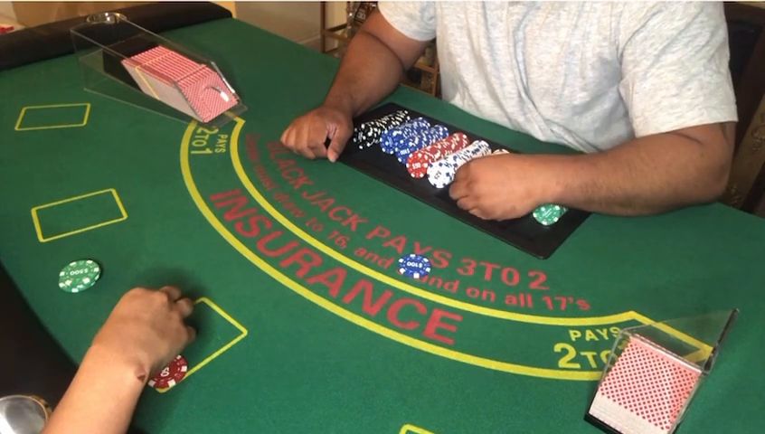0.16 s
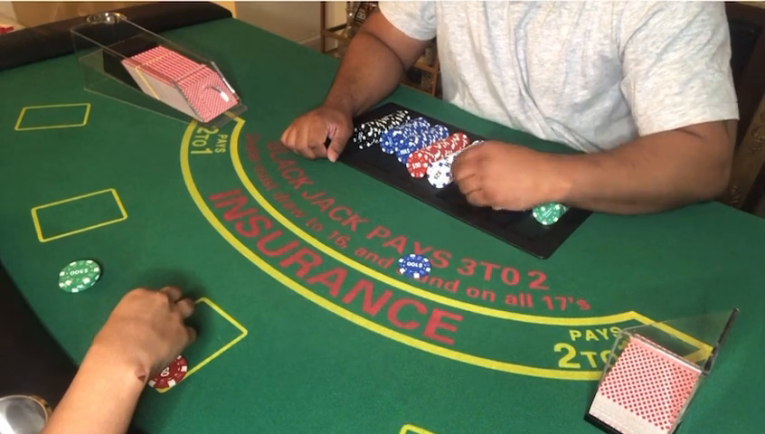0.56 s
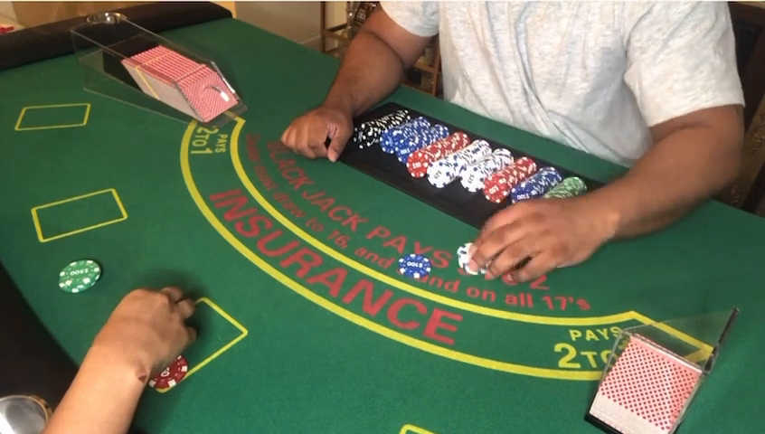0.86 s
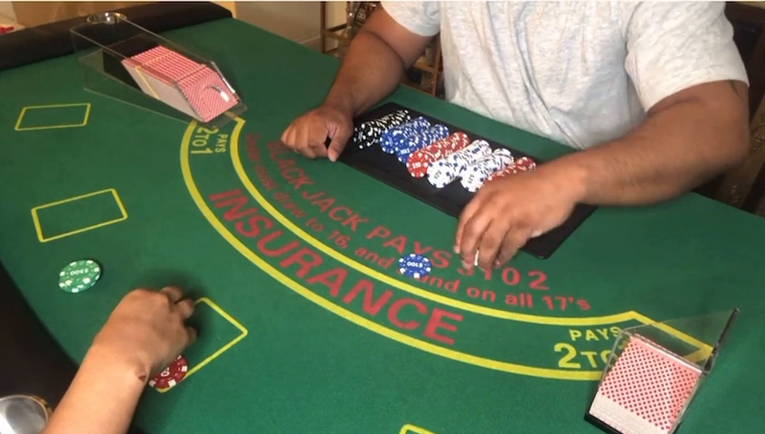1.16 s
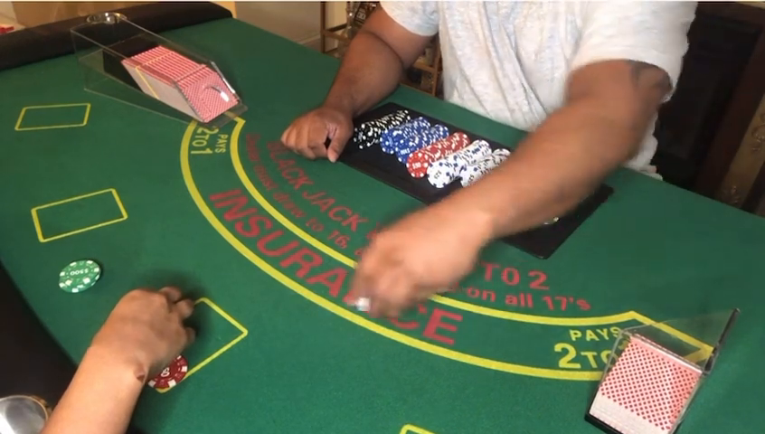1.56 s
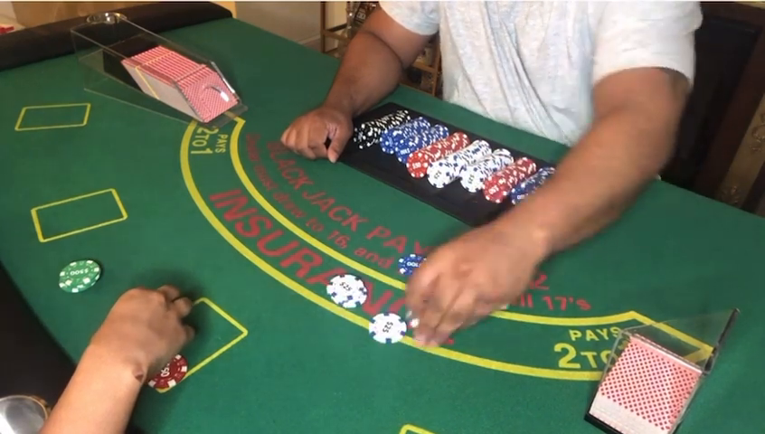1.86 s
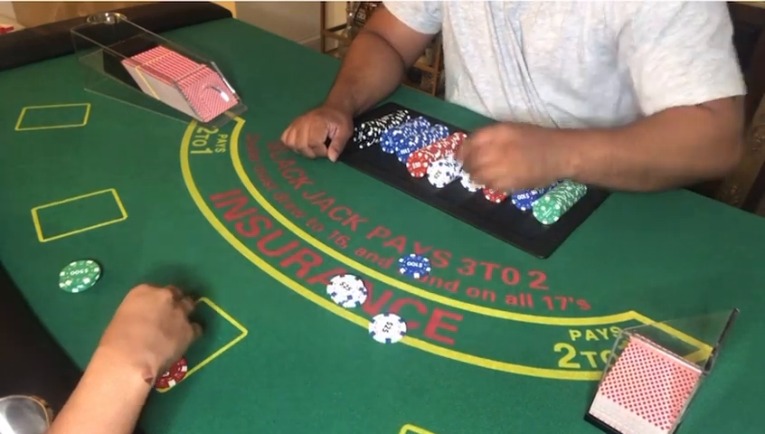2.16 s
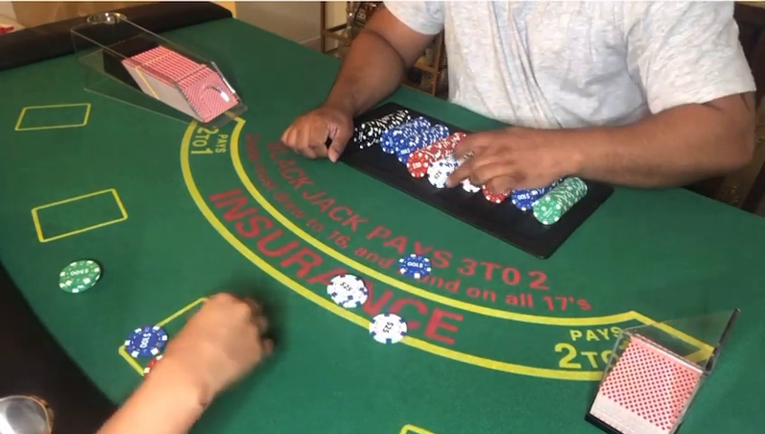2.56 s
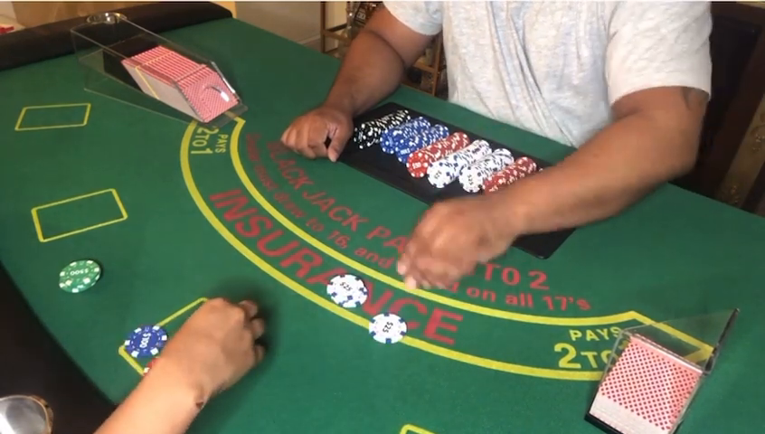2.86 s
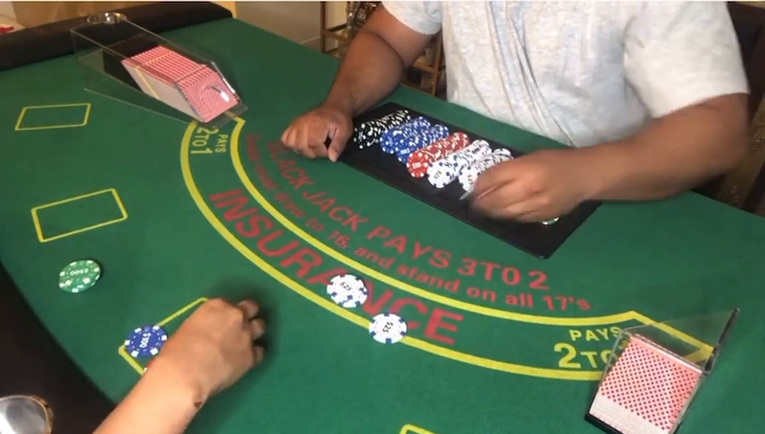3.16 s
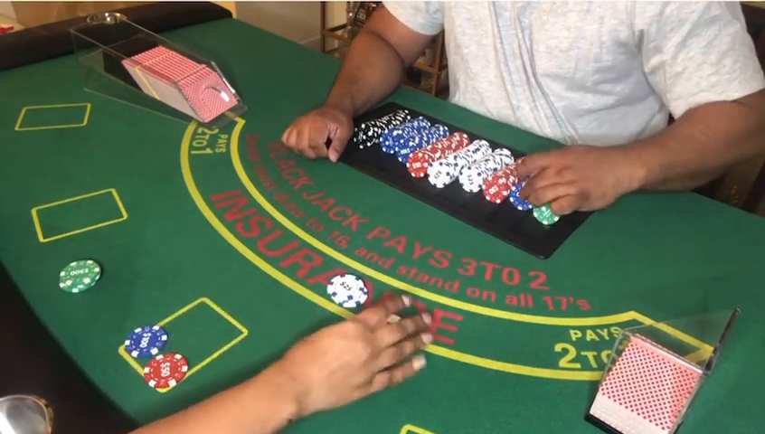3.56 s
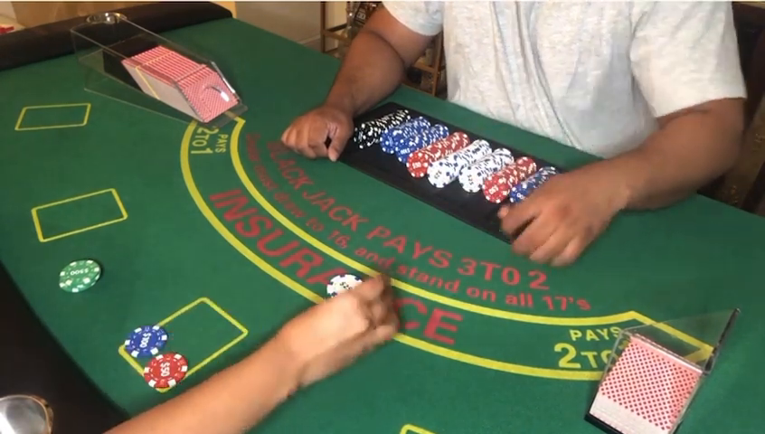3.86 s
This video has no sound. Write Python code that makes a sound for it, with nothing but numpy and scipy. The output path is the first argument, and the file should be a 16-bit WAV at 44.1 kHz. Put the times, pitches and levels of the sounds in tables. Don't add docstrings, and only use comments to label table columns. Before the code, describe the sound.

Hard plastic chips click onto a felt table, with hollow tray knocks and soft hand brushes

```python
import sys
import numpy as np
from scipy import signal
from scipy.io import wavfile
from scipy.ndimage import uniform_filter1d

SR = 44100
rng = np.random.default_rng(int(sys.argv[2]) if len(sys.argv) > 2 else 0)


def to_wav(sig):
    pcm = np.clip(np.atleast_2d(sig), -1, 1) * 32767
    pcm = np.round(pcm).astype(np.int16)
    wavfile.write(sys.argv[1], SR, pcm.T)


def amplitude_ratio(level_db):
    exponent = np.asarray(level_db, float) / 20
    return 10 ** exponent


N = 176400


def evened(x):
    return x / np.sqrt(np.mean(x ** 2) + 1e-20)


def read(points, hz):
    f, value = np.transpose(points)
    return np.interp(np.log(hz + 1), np.log(f + 1), value)


def add(mix, s, db, sound):
    part = mix[round(s * SR):][:len(sound)]
    part += amplitude_ratio(db) * sound[:len(part)] / abs(sound).max()


def resonate(x, hz, width):
    r = np.exp(-np.pi * width / SR)
    return signal.lfilter([1 - r, 0, r - 1], [1, -2 * r * np.cos(2 * np.pi * hz / SR), r * r], x)


def ring(modes, pitch, stretch, tilt, spread_db, detune, size):
    hz, db, t60 = np.transpose(modes)[:, :, None]
    t = np.arange(size) / SR
    pitch_luck, level_luck = rng.standard_normal((2, len(modes), 1))
    wave = np.sin(2 * np.pi * hz * pitch * (1 + detune * pitch_luck) * t)
    level = db + tilt + spread_db * level_luck - 60 * t / (t60 * stretch)
    return (amplitude_ratio(level) * wave).sum(0)


def push(ms):
    return np.hanning(max(int(ms * SR / 1000), 1) + 2)


def hiss(spectrum, patchy_db):
    frames, hz = N // 128 + 5, np.fft.rfftfreq(1024, 1 / SR)
    a, b, patches = rng.standard_normal((frames // 2 + 3, 513, 3)).T
    patches = uniform_filter1d(patches, size=14, axis=0)
    patches = evened(uniform_filter1d(patches, size=8, axis=1))
    z = (a + 1j * b) * amplitude_ratio(read(spectrum, hz)[:, None] + patchy_db * patches)
    return evened(signal.istft(z, nperseg=1024, noverlap=768)[1][:N])


def air():
    # frequency in Hz, level in dB per Hz.
    room_tone = [(28, -21.5), (55, 13), (140, -2.5), (330, -2), (900, -12.5), (1500, -17), (2600, -22),
                 (16000, -34)]
    whine_hz, waver_hz = 4500, 35
    waver = waver_hz * evened(uniform_filter1d(rng.standard_normal(N), size=300))
    whine = np.sin(2 * np.pi * np.cumsum(whine_hz + waver) / SR)
    return amplitude_ratio(-61) * hiss(room_tone, patchy_db=1.0) + amplitude_ratio(-79) * whine


def brush():
    # start in seconds, length in seconds, hiss in dB,
    # scrape in dB, fizz in dB over the hiss.
    slides = [(-0.003, 0.21, -81, -62, -20), (0.185, 0.088, -65, -48, -29), (0.29, 0.23, -67.5, -60.5, -30),
              (0.503, 0.24, -62, -67, -18), (0.674, 0.16, -60.5, -58.5, -22),
              (0.912, 0.18, -60.5, -64, -20), (1.098, 0.072, -59, -51.5, -35),
              (1.178, 0.075, -69.5, -62, -12), (1.371, 0.34, -62.5, -62.5, -9),
              (1.633, 0.22, -67.5, -63, -11), (1.831, 0.091, -65.5, -60, -13),
              (2.05, .14, -88.5, -90, -9.5), (2.721, 0.11, -57.5, -58.5, -15.5),
              (2.817, .17, -55.5, -56, -14.5), (3.026, 0.12, -81.5, -80, 1), (3.508, 0.26, -71, -80, -8),
              (3.758, 0.5, -65, -78, -11)]
    # frequency in Hz, level in dB per Hz.
    felt = [(300, -0.5), (1000, 7.5), (3000, 4), (7000, -0.5), (9500, -16), (15000, -29.5)]
    # frequency in Hz, width in Hz, level in dB.
    scrape_bands = [(156, 6.7, -7.5), (323, 124, 1.5), (483, 380, 0), (812.5, 270, -6.5),
                    (1210, 130, -31.5)]
    t, level = np.arange(N) / SR, np.zeros((3, N))
    for s, length, hiss_db, scrape_db, fizz_db in slides:
        rise = np.sin(np.pi / 2 * np.clip((t - s) / (0.26 * length + 0.0078), 0, 1)) ** 2
        late = t - s - length
        fade_db = -200 * np.maximum(late + 0.024, 0) - 1300 * np.maximum(late + 0.036, 0) ** 2
        peaks = amplitude_ratio([[hiss_db], [scrape_db], [hiss_db + fizz_db]])
        level += peaks * rise * amplitude_ratio(fade_db)
    lumps = evened(uniform_filter1d(rng.standard_normal((2, N)), size=350))
    fine_grain, coarse_grain = amplitude_ratio(np.array([[1.2], [2.5]]) * lumps)
    slips = coarse_grain * rng.standard_normal(N)
    scrape = np.zeros(N)
    for hz, width, db in scrape_bands:
        scrape += amplitude_ratio(db) * evened(resonate(resonate(slips, hz, width), hz, 2 * width))
    fizz = resonate(fine_grain * rng.standard_normal(N), 12500, 6000)
    rubbing = evened(fine_grain * hiss(felt, patchy_db=2.0))
    return level[0] * rubbing + level[1] * evened(scrape) + level[2] * evened(fizz)


def thumps():
    # start in seconds, peak in dB, level of the upper modes in dB.
    blows = [(0.05, -42, -2), (0.211, -46, -31), (0.382, -48, 5), (0.624, -46, -3), (0.712, -26.5, -2.5),
             (0.745, -28.5, -13.5), (1.038, -42.5, -15), (1.131, -46, -8), (1.513, -29.5, -19.5),
             (1.669, -29.5, 3), (1.743, -34.5, -8.5), (1.869, -40.5, -20), (2.151, -46.5, -11),
             (2.296, -37.5, 3), (2.905, -49.5, -25), (3.369, -35, -4), (3.538, -36, -2),
             (3.949, -30, -15.5)]
    # frequency in Hz, level in dB, t60 in seconds.
    table_modes = [(75, -9.5, 0.22), (98, -11.5, 0.22), (127, -8.5, 0.098), (142.5, 4.5, .28),
                   (164, -9, 0.065), (195, -4.5, 0.17), (260, -3.5, 0.08), (323, -1, 0.085),
                   (455, -6.5, 0.16)]
    is_upper = (np.transpose(table_modes)[0] > 170)[:, None]
    for_all = np.zeros(N)
    for s, db, upper_db in blows:
        boom = ring(table_modes, 0.98, 1, is_upper * (upper_db + 15.5),
                    spread_db=1.0, detune=0.012, size=16000)
        force = np.convolve(push(1.3), rng.standard_normal(8).repeat(60))
        force = force - force.mean()
        add(for_all, s, db - 3.0, signal.oaconvolve(boom, force))
    return for_all


def knocks():
    # start in seconds, peak in dB, pitch factor, edge in dB,
    # share of the rim touch.
    tray_hits = [
        (.965, -45, 1.1, -23, .6),
        (1.663, -46, 0.68, -14, 0.21),
        (2.298, -3, 0.98, -17.5, -0.26),
        (2.3396, -11, 0.875, -7.5, -0.18),
    ]
    # start in seconds, peak in dB,
    # pitch factor, edge in dB, share of the rim touch.
    well_hits = [
        (0.2165, -48, 1.1, -30, 0.36),
        (0.236, -55, 0.72, -30, 0.54),
        (0.3601, -37, 1.5, -36, 0.53),
        (.377, -49, 0.88, -37, 0.9),
        (.4125, -43, 1.13, -19, 0.72),
        (3.3522, -21, 1, -22.5, -0.031),
        (3.3655, -21.5, 1.1, -20, -0.18),
        (3.522, -15.5, 0.99, -11.5, 0.16),
    ]
    # frequency in Hz, level in dB, t60 in seconds.
    tray_modes = [(435, -29.5, 0.016), (719, -17.5, .016), (830, -0.5, 0.023), (1086, 0, 0.011),
                  (1338, 1, 0.015), (1596, 2.5, 0.0079), (2135, -12.5, 0.0062)]
    # frequency in Hz, level in dB, t60 in seconds.
    well_modes = [(820, -4.5, 0.03), (1040, -6.5, 0.015), (1363, 1, 0.013), (1616, -0.5, 0.013),
                  (2320, -10, 0.012), (3230, -23, .006)]
    touch_ms, lead_ms = 0.2, 1.282
    body, near, around = np.zeros((3, N))
    t = np.arange(400) / SR
    for hits, modes, cut_hz in [(tray_hits, tray_modes, 480), (well_hits, well_modes, 650)]:
        thin = signal.butter(2, cut_hz, "high", fs=SR)
        for s, db, pitch, edge_db, rim in hits:
            gap = np.zeros(int(lead_ms * SR / 1000))
            force = np.r_[rim * push(touch_ms), gap, push(touch_ms)]
            if db < -30:
                force = np.convolve(force, push(1.1))
            hollow = ring(modes, pitch, 1, 0, spread_db=1.5, detune=.015, size=3000)
            add(body, s, db, signal.lfilter(*thin, np.convolve(hollow, force)))
            crackle = rng.standard_normal(400) * t * amplitude_ratio(-60 * t / .005)
            edge = resonate(resonate([crackle, 1. * (t == 0)], 3000, 2500), 2500, 2500)
            add(near, s + 0.00089, db + edge_db, edge[0])
            add(around, s, db + edge_db + 5.5, edge[1])
    return body + near, body + around


def clacks():
    # start in seconds, peak in dB, length in ms,
    # brightness in dB per octave, pitch factor.
    slaps = [(0.148, -60, 2.1, -9, .9), (0.1966, -46.5, 2.2, -11, 0.57), (0.31, -49, 2.5, -23, 0.62),
             (0.3877, -58, 2.1, -19, 0.72), (0.413, -54, 2.1, -17, 0.56), (0.4218, -45, 5.9, -2, 0.41),
             (0.7098, -26.5, 2.8, -9.5, 0.94), (0.7121, -24.5, 1.3, -5, 1.15),
             (0.7269, -25.5, 9, -11.5, 0.92), (0.7445, -20.5, 0.42, -10, 1), (1.0325, -27, 4, -7, 0.86),
             (1.5152, -14, 4.4, 5, 1.1), (1.5273, -12, 1.3, -11, 0.89), (1.5296, -17, 3.4, -6, 1.02),
             (2.06, -53, 2.2, 3, 1.02), (2.2467, -18.5, 0.72, -25, 0.59), (2.248, -24, 1.5, -11, 0.97),
             (2.3166, -13, 4.1, -10, 1.03), (2.326, -32, 3.1, -9, 0.82), (2.3361, -24, 1.5, 8, .8),
             (2.6894, -53, 2.1, 13, 1.02), (3.3186, -16, 0.64, -8, 0.53), (3.365, -30, 0.45, 3, 1.8),
             (3.366, -4.5, 1.54, 16, 1.047), (3.368, -9.5, 1.5, 11.5, 1.07), (3.603, -48.5, 2.1, -3, 1.3),
             (3.9427, -18, 2.4, -13, 0.69), (3.9498, -7, 2.1, 18, 1.17), (3.9529, -16.5, 2, 8, 1.05),
             (3.958, -14, 5.3, 11, 1.06), (3.9668, -16.5, 3.1, 10, 1.1)]
    # frequency in Hz, width in Hz, level in dB.
    stack = [(1460, 1900, -2), (3300, 2300, -0.5), (4997, 1300, 16.5), (6440, 300, 5.5), (9200, 2700, -2.5),
             (13100, 650, -13), (14900, 330, -1.5)]
    near, around, t = np.zeros(N), np.zeros(N), np.arange(900) / SR
    impulse = 1. * (t == 0)
    for s, db, ms, bright, pitch in slaps:
        contacts = rng.standard_normal(900) * amplitude_ratio(3.0 * rng.standard_normal(900))
        chatter = contacts * np.minimum(t / .0003, 1) ** 2 * amplitude_ratio(-12 * (1000 * t / ms) ** 1.5)
        body = np.zeros(900)
        for hz, width, gain_db in stack:
            slope = bright if hz > 5500 else min(bright + 6, 0)
            tuned_hz = hz * pitch if hz < 10000 else hz
            body += amplitude_ratio(gain_db + slope * np.log2(hz / 5000)) * resonate(impulse, tuned_hz, width)
        slap = np.convolve(chatter, body)[:900]
        add(near, s, db - 1.5, slap)
        crest_db = 20 * np.log10(abs(evened(body)).max() / abs(evened(slap)).max())
        add(around, s, db - 1.5 + crest_db, body)
    return near, around


def clinks():
    # start in seconds, peak in dB, brightness in dB per
    # octave, ring length factor, level of the middle modes in dB.
    strikes = [(0.1968, -62, -3, .3, -7), (0.425, -69, -5, .3, -12), (1.0326, -37.5, -15, 0.6, -5),
               (1.4947, -35, 1, 2, -8), (1.5158, -14.5, 7.5, 1, 7), (1.5273, -16, 0, 1.2, 5),
               (1.530, -19.5, 20, 0.56, -3), (1.916, -48, 11.5, 0.53, 1), (3.318, -35, -5, 0.64, 0),
               (3.9437, -15, -1, 0.77, -8), (3.9498, -7.5, -8, 0.41, -16), (3.9523, -19, 4, 0.45, -7),
               (3.958, -18, 1, 0.65, -9), (3.9625, -16, 9, 0.63, -2), (3.967, -19, -3, 0.5, -9)]
    # frequency in Hz, level in dB, t60 in seconds.
    chip_modes = [(4110, -11, .06), (4870, -12, .02), (5650, -8, .03), (5980, -9, .03), (6450, -3, .055),
                  (6630, 0, .045), (7670, -15, .02), (8490, -9, .03), (9150, -9, .025), (10800, -12, .015),
                  (11900, -14, .012), (13750, -11, .04), (14750, -10, .03), (15200, -9, .025)]
    out = np.zeros(N)
    octaves = np.log2(np.transpose(chip_modes)[0] / 6550)[:, None]
    middle = (octaves > .15) & (octaves < .6)
    onset = np.minimum(np.arange(6000) / SR / .0004, 1)
    for s, db, bright, stretch, middle_db in strikes:
        above, below = bright * np.sqrt(abs(octaves)), -abs(bright * octaves)
        tilt = np.where(octaves > 0, above, below) + middle * middle_db
        chip = ring(chip_modes, 0.99, stretch, tilt, spread_db=1.0, detune=0.0028, size=6000)
        add(out, s, db + 1.5, onset * chip)
    return out


def room(x):
    # frequency in Hz, t60 in seconds.
    decay = [(100, 0.85), (300, 0.29), (1000, 0.41), (3000, 0.45), (7000, 0.36), (14000, 0.21)]
    # delay in ms, level in dB.
    walls = [(8.7, -19), (11.3, -21), (15.1, -18), (22.4, -22)]
    taps, at = np.zeros(SR), np.arange(0, SR - 12, 12)
    taps[at + rng.integers(0, 12, len(at))] = rng.choice([-1., 1.], len(at))
    hz, t, z = signal.stft(taps, SR, nperseg=256)
    tail = signal.istft(z * amplitude_ratio(-60 * t / read(decay, hz)[:, None]), SR, nperseg=256)[1]
    ms = 1000 * np.arange(len(tail)) / SR
    tail = tail * np.clip(ms / 8, 0, 1) ** 2
    tail = tail / np.linalg.norm(tail)
    for delay_ms, db in walls:
        add(tail, delay_ms / 1000, db, signal.firwin(9, 7000, fs=SR))
    return signal.fftconvolve(x, tail)[:N]


def scene():
    background = air() + brush() + thumps()
    tray, tray_around = knocks()
    slaps, slaps_around = clacks()
    ringing = clinks()
    wet = room(amplitude_ratio(1.5) * ringing + amplitude_ratio(2.0) * tray_around + amplitude_ratio(-0.1) * slaps_around)
    return (ringing + slaps + tray + amplitude_ratio(-8) * wet + background)[None]


def top_cut(x):
    return signal.sosfilt(signal.butter(12, 17050, fs=SR, output="sos"), x)


def record(dry):
    bass_cut = signal.butter(3, 60, "high", fs=SR, output="sos")
    x = signal.sosfilt(bass_cut, dry)
    x = signal.oaconvolve(x, signal.firwin(511, 16100, fs=SR)[None], "same")
    return top_cut(x)


dry = scene()
out = record(dry)
to_wav(out)
```